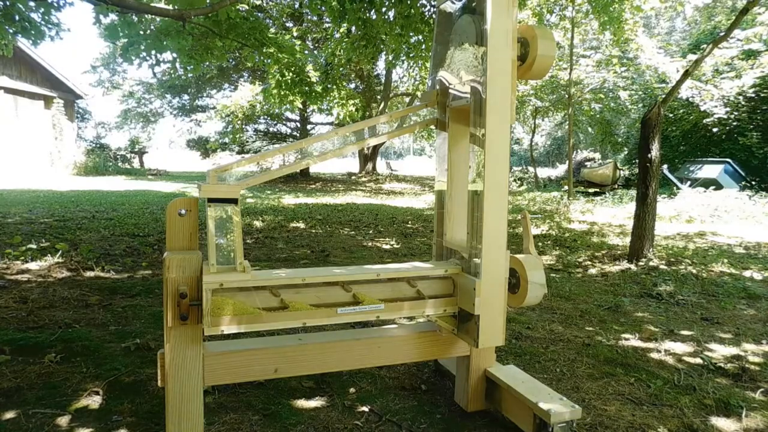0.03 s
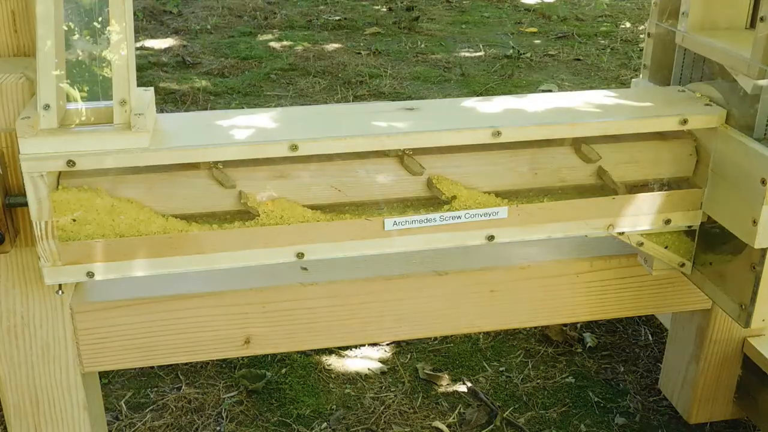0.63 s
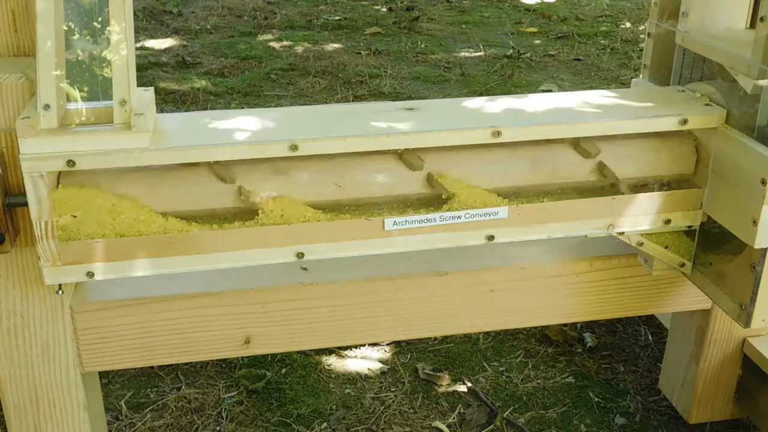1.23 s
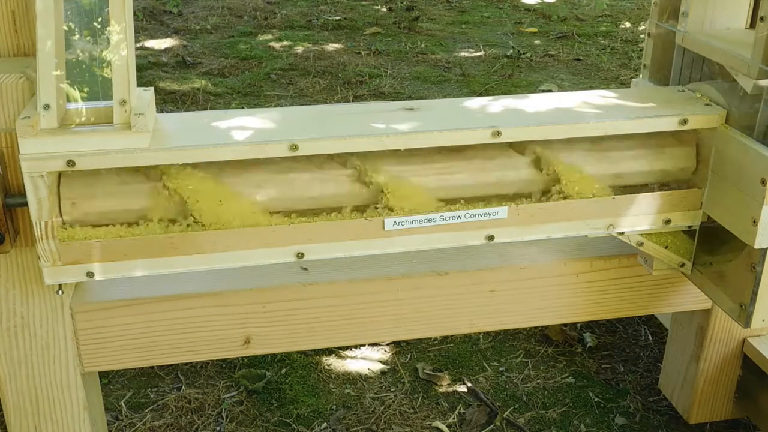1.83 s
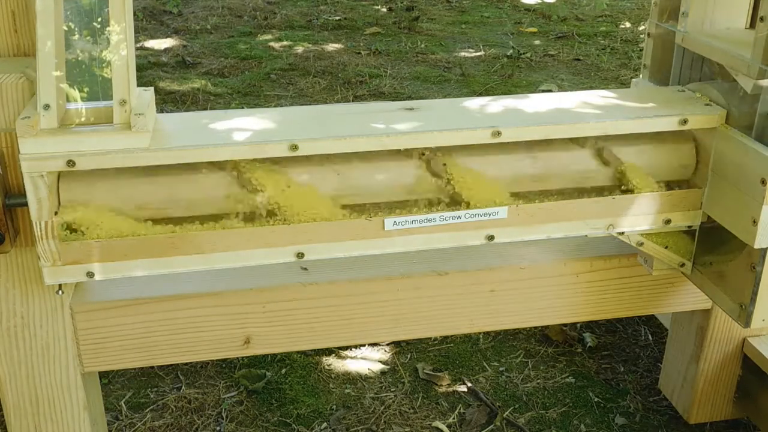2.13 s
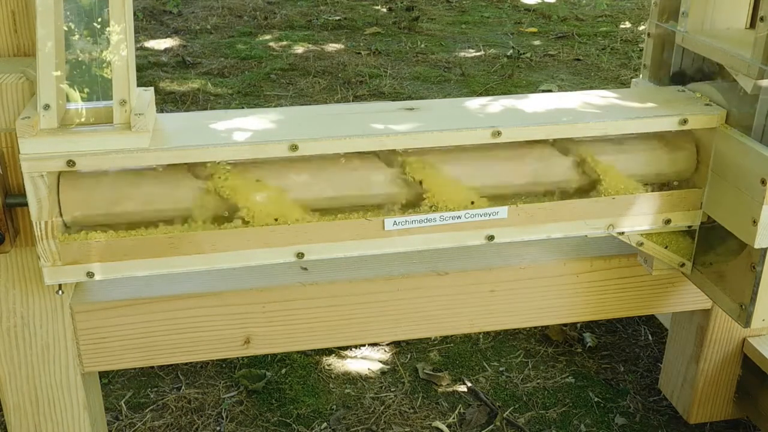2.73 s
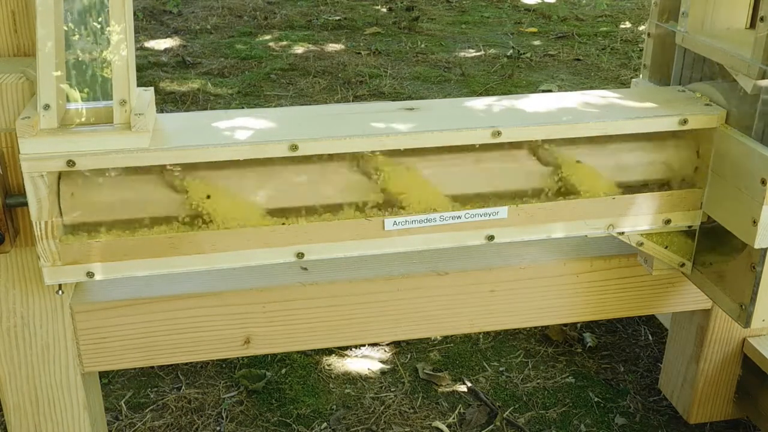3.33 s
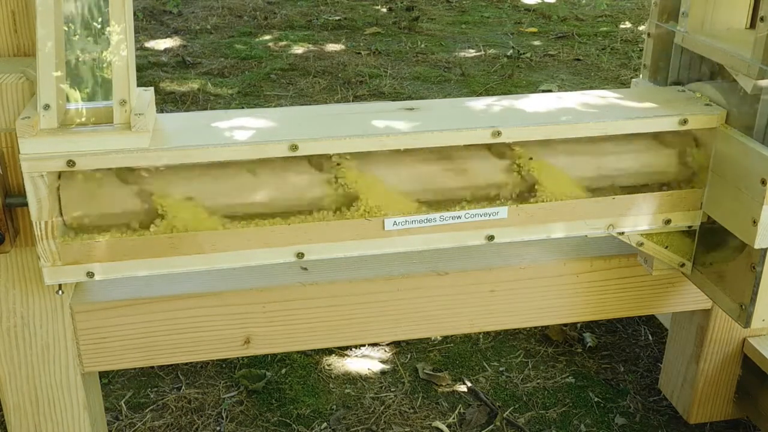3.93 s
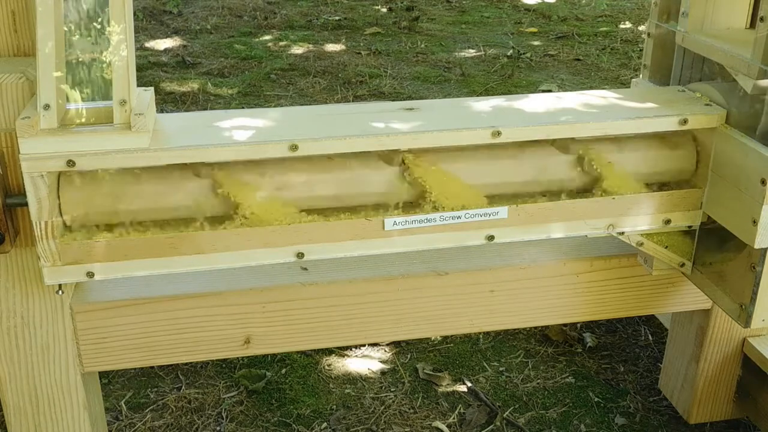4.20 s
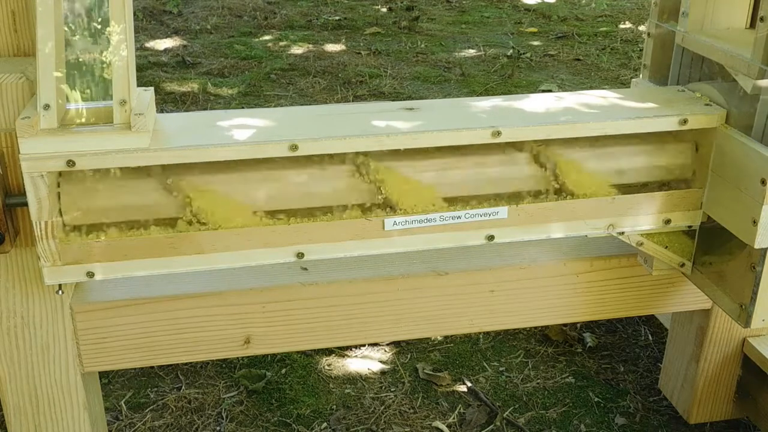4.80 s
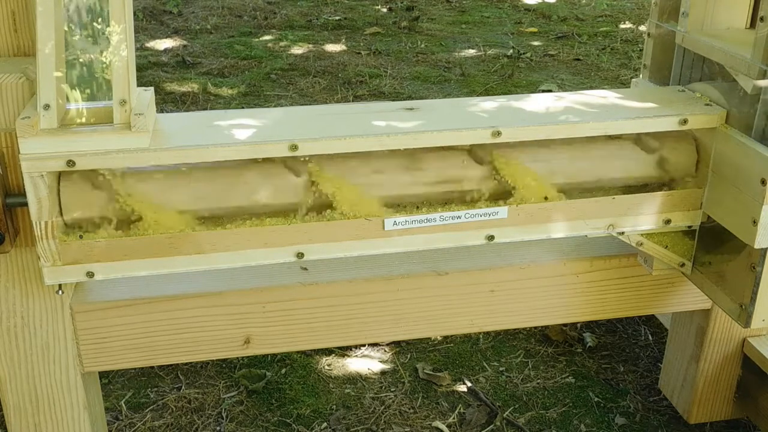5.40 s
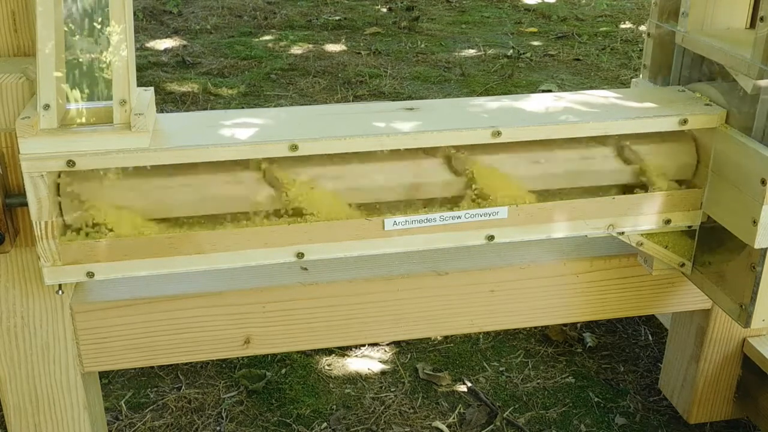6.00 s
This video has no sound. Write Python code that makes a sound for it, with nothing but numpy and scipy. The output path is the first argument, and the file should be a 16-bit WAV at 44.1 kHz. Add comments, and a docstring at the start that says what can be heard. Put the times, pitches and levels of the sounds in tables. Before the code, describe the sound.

After a faint outdoor hush and a few light knocks, a wooden screw conveyor starts turning close to the microphone. Dry grain slides and crunches along the trough, spilling off the screw in regular hissing surges. Wood grinds on wood, and the loose drive keeps up irregular clacks, knocks and low thumps over a faint open-air rumble.

```python
"""A faint outdoor hush and a few light knocks, then a wooden screw conveyor gets going close by.
Dry grain slides along the trough, crunches under the screw and tips off it in hissing heaps.
Wood grinds on wood, and the loose drive knocks and thumps in its frame, ringing the boards.
The stereo microphone stands near the trough in the open air, with a low rumble on all sides."""
import sys
import numpy as np
from scipy import signal
from scipy.io import wavfile

SR = 44100
rng = np.random.default_rng(int(sys.argv[2]) if len(sys.argv) > 2 else 0)


def transcribe(u):
    """Save the signal u as a 16-bit wav file named by the first command-line argument.

    u: samples, shape (n,) or (channels, n), limited to [-1, 1]; the rate is SR.
    q: integer samples, one column per channel.
    """
    v = np.clip(np.atleast_2d(u).T, -1, 1)
    q = np.round(v * 32767).astype(np.int16)
    wavfile.write(sys.argv[1], SR, q)


N = 271215
TIME = np.arange(N) / SR
LEFT_RIGHT = np.array([[1], [-1]])  # sign of the side signal in each channel

# flow of grain along the trough as the screw gets going: (time [s], level [dB])
GRAIN_FLOW = [(0.4, -69), (0.96, -70), (1.42, -53.5), (1.86, -40.5), (1.92, -48), (2.34, -40), (2.5, -40),
              (3.04, -38), (3.95, -38), (4.15, -36.5), (4.96, -38), (5.36, -40.5), (5.52, -39), (5.75, -36),
              (6.15, -38.5)]
# heaps tip off the screw about 2.5 times a second: (time [s], swell time [s], peak level [dB])
TIPPING_HEAPS = [(1.946, 0.026, -33), (2.361, 0.022, -34), (2.754, 0.01, -33.5), (3.137, 0.02, -33),
                 (3.512, 0.012, -32), (3.918, 0.018, -33.5), (4.273, 0.0094, -34), (4.678, 0.016, -33.5),
                 (5.083, 0.012, -31.5), (5.563, 0.02, -34.5), (5.928, 0.024, -35)]
# a jammed kernel rasps through: (time [s], length [s], level [dB])
KERNEL_RASPS = [(0.42, 0.082, -57), (1.485, 0.033, -44.5), (2.115, 0.034, -35), (2.525, 0.028, -36.5),
                (3.29, 0.06, -37), (3.7, 0.12, -50), (4.4, 0.039, -34), (4.83, 0.045, -33.5)]
# single kernels crack under the screw: (time [s], level [dB], centre [Hz])
KERNEL_CRACKS = [(0.947, -51, 4500), (1.2303, -32.5, 8900), (1.492, -41, 6960), (1.569, -39.5, 6900),
                 (1.606, -41, 7000), (1.638, -36.5, 6000), (1.667, -37, 5940), (1.763, -36, 7460),
                 (1.9226, -33, 3300), (1.946, -30, 4230), (2.175, -34, 4860), (2.207, -36, 4470),
                 (2.5037, -32, 3000), (2.5207, -26, 2900), (3.269, -29, 3000), (3.7464, -28, 3200),
                 (4.3957, -30, 3200), (4.827, -32, 3120)]
# pressure of the screw on its wooden bearings, heard as rubbing: (time [s], level [dB])
BEARING_RUB = [(0.4, -101), (0.91, -62), (1.33, -52.5), (1.5, -47), (1.78, -38.5), (1.9, -40.5),
               (2.08, -45.5), (2.29, -43), (2.48, -41), (2.62, -42), (2.85, -42), (3.7, -40.5), (4.34, -39),
               (5.32, -43.5), (5.6, -40), (6.15, -41.5)]
# the screw scuffs along the boards: (time [s], length [s], level [dB])
BOARD_SCUFFS = [(0.42, 0.17, -60), (1.15, 0.067, -47.5), (2.42, 0.053, -34), (2.57, 0.035, -46),
                (2.685, 0.031, -34.5), (2.835, 0.033, -36.5), (3.04, 0.014, -30.5), (4.048, 0.046, -30.5),
                (4.228, 0.01, -34.5), (4.7, 0.034, -36), (5.16, 0.071, -43.5), (6.11, 0.044, -36)]
# the loose drive knocks on the trough: (time [s], base level [dB], hardness [dB], rattle [dB],
# ring pitch [Hz], ring level [dB], ring t60 [s])
DRIVE_KNOCKS = [(0.402, -54.5, 4, -5, 820, -58, .03), (0.8886, -54, 0, -3, 1310, -42, .045),
                (0.945, -53.5, 5, 2, 1290, -58, .04), (1.2298, -39, 12.5, 5, 2260, -23, 0.046),
                (1.3638, -33, 1.5, -2, 940, -41, 0.041), (1.434, -40.5, -5, 5, 900, -48, .04),
                (1.617, -38, -21, -18, 560, -39, .04), (1.638, -36.5, -1, -3, 466, -46, .046),
                (1.761, -33, 6.5, 3, 744, -44, .03), (1.7631, -30, 11.5, -1, 2105, -28, 0.045),
                (1.7653, -31.5, 4.5, -7, 1360, -21, 0.047), (1.7668, -33, -9, 8, 470, -27.5, 0.063),
                (1.7862, -31.5, 7, -13, 1118, -21, .06), (1.801, -35, -1, -6, 1120, -30, .05),
                (1.826, -34.5, -4, -6, 450, -32, .09), (2.003, -35.5, -20, 0, 546, -50, .11),
                (2.081, -37.5, 0, 2, 505, -38, .036), (2.2715, -33.5, -1, 3, 760, -25.5, 0.023),
                (2.385, -30, -10, -3, 476, -32, 0.21), (2.462, -36, -10, -3, 525, -38, .03),
                (2.5031, -38.5, 6, -7, 1420, -34, .04), (2.551, -40, -15, 0, 480, -43, .08),
                (2.581, -32, -17, 1, 960, -38, 0.099), (2.746, -31.5, -7, -13, 550, -28, .044),
                (2.866, -31, -4, 6, 958, -33, 0.16), (3.024, -33, 6, -3, 476, -42, .073),
                (3.201, -40, -12, 7, 820, -54, 0.034), (4.026, -40, -5, 2, 940, -38, .088),
                (4.046, -46, -7, 4, 950, -35, 0.087), (4.123, -37, -5, -3, 556, -42, .05),
                (4.2115, -28.5, -11, -17, 553, -38, 0.057), (4.4467, -29, 4.5, -6, 720, -21, 0.031),
                (4.449, -34, 4, -3, 1407, -24, 0.22), (4.465, -36, 6, 8, 720, -37, .05),
                (4.9333, -29.5, -.5, -11, 950, -40, .03), (5.109, -39.5, -5, -6, 972, -44, .04),
                (5.164, -37, -11, 4, 483, -40, .05), (5.202, -32, -11, -3, 890, -40, .043),
                (5.389, -35.5, -15, -2, 473, -47, .05), (5.507, -36, -1.5, 7, 560, -49, 0.042),
                (5.8095, -31.5, 4.5, -5, 467, -38, 0.22)]
# the screw drops heavily in its frame: (time [s], base level [dB], ring pitch [Hz])
FRAME_THUMPS = [(1.7786, -35, 413), (2.6431, -30.5, 320), (3.203, -38.5, 290), (3.54, -29.5, 307),
                (3.551, -39, 660), (3.686, -40.5, 200), (3.806, -41, 460), (3.96, -41, 131),
                (4.06, -44, 304), (4.189, -37, 350), (4.807, -40, 346), (4.876, -36.5, 347),
                (4.9974, -35.5, 380), (5.6713, -26, 340), (5.682, -44, 172), (5.699, -41, 382),
                (5.8639, -35, 700), (5.995, -38, 700)]
# low outdoor rumble: (time [s], level [dB])
RUMBLE_LEVEL = [(0, -60.5), (1.3, -63), (2.2, -65), (3, -61.5), (3.75, -58.5), (3.97, -50), (4.06, -64),
                (4.4, -59), (4.85, -55), (5.01, -47), (5.16, -63), (5.5, -57), (5.73, -51.5), (6.15, -61)]
# the sound drops out briefly near the start: (time [s], gain [ratio])
DROPOUT_GAIN = [(0, 1), (.025, 1), (.04, 0), (.17, 0), (.195, 1), (6.15, 1)]

# modes of the trough and frame, the screw and drive, and the clear window that kernels patter on:
# (frequency [Hz], relative level [dB], t60 [s])
TROUGH_MODES = [(116, 1.5, 0.14), (164, -10.5, 0.077), (200, -9, 0.035), (310, -7, 0.12), (330, -5, 0.068),
                (380, -20.5, 0.018), (434, 5, 0.058), (475.4, 3.5, 0.082), (494, 9, 0.027),
                (560, -1.5, 0.046), (700, 1, 0.069), (870, 3.5, 0.066), (951, -3, 0.24), (977, -3.5, 0.077)]
SCREW_MODES = [(1120, 0, 0.07), (1260, 1.5, 0.032), (1362, -2, 0.054), (1490, 4.5, 0.036),
               (1840, -7.5, 0.038), (2164, -0.5, 0.034), (2373, 0, 0.032), (2734, 6.5, 0.02),
               (3002, 9.5, 0.034), (3760, -2, 0.049), (4435, 10.5, 0.052)]
WINDOW_MODES = [(3650, -13, .01), (4250, -6.5, .01), (6370, -2, 0.0041), (9100, 1, .0045)]
# tone of each noise, from the grain to the background: (frequency [Hz], relative band gain [dB])
SLIDE_TONE = [(1500, 4.5), (2600, 5), (3700, 4.5), (5000, 2), (7000, 1), (9200, -3), (12000, -5),
              (16000, -7)]
CRUNCH_TONE = [(500, -39), (900, 4.5), (1400, -9), (1700, -3.5), (2300, 0.5), (2900, 0), (3500, -11.5),
               (4500, -10.5), (8000, -21.5)]
HEAP_TONE = [(1500, 3.5), (2600, -0.5), (3700, 4), (5000, 0.5), (7000, 0), (9200, -3), (12000, -8.5),
             (16000, -12)]
GRIND_TONE = [(70, -13), (130, -19.5), (200, -6.5), (300, -2), (480, -8), (700, 5.5), (1000, -5),
              (1500, -2), (3000, -10.5)]
HUSH_TONE = [(150, 3.5), (300, -0.5), (600, 0.5), (1100, 5), (2000, 0.5), (3200, -6), (6000, -11.5),
             (10000, -13.5), (16000, -14.5)]
RUMBLE_TONE = [(22, 7.5), (40, 2), (62, 5), (100, 3), (160, -19), (300, -12.5)]
# stereo image at the microphone of the conveyor close by and of the open air all around:
# (frequency [Hz], channel likeness [-1..1], left minus right [dB])
CLOSE_IMAGE = [(100, 0.9, -1), (290, 0.98, -1), (700, 0.94, -0.6), (1300, 0.81, -0.5), (2100, 0.74, -2.5),
               (3300, 0.46, -1.5), (5500, 0.16, 0), (9100, -0.34, 3.5), (15000, -0.13, 1)]
AMBIENT_IMAGE = [(40, 0.8, -4.5), (110, 0.73, 1), (200, 0.21, -1.5), (700, 0.21, 0), (1300, 0.17, -0.5),
                 (2400, 0, -0.5), (15000, 0, 0)]


def sliding_grain():
    """Thousands of kernels tick along the boards close by; a stronger flow brings more of them."""
    flow = driven(GRAIN_FLOW, running_db=-41, follows=1.1, waver_db=0)
    per_s = 900 + 9000 * flow / flow.max()
    ticks = contacts(per_s, spread_db=0) / np.sqrt(per_s)
    return flow * band_noise(ticks, SLIDE_TONE, CLOSE_IMAGE, flicker_db=1)


def crunching_grain():
    """Squeezed kernels snap past each other in clumps and make the screw ring a little."""
    snaps = contacts(3800 * from_db(2.6 * drift(25)), spread_db=1)
    crackle = band_noise(snaps, CRUNCH_TONE, CLOSE_IMAGE, flicker_db=0.5)
    crunch = through(crackle, tap_response(SCREW_MODES, ring_db=-43))
    flow = driven(GRAIN_FLOW, running_db=-41, follows=0.92, waver_db=-1.5)
    squeeze = np.hypot(flow, swells(KERNEL_RASPS))
    return np.hypot(squeeze, from_db(-4) * heap_strength()) * unit_rms(crunch)


def spilling_grain():
    """Each falling heap showers the window with kernels and rings it brightly."""
    shower = band_noise(contacts(9000, spread_db=1), HEAP_TONE, CLOSE_IMAGE, flicker_db=1)
    patter = through(shower, tap_response(WINDOW_MODES, ring_db=-20.5))
    return heap_strength() * unit_rms(patter)


def heap_strength(drain_ratio=1.82, trickle_db=-7.5, trickle_s=0.17):
    """Each tipping heap swells, drains more slowly and leaves a dying trickle."""
    power = np.zeros(N)
    for s, swell_s, db in TIPPING_HEAPS:
        t = TIME - s
        surge = np.exp(-.5 * (t / np.where(t < 0, swell_s, swell_s * drain_ratio)) ** 2)
        trickle = from_db(trickle_db) * (t > 0) * np.exp(-.5 * (t / trickle_s) ** 2)
        power += (from_db(db) * np.maximum(surge, trickle)) ** 2
    return np.sqrt(power)


def cracking_kernels():
    """Pinched kernels crack: each dies within a few milliseconds and leaves a faint scatter."""
    t, out = TIME[:SR // 4], np.zeros((2, N + SR))
    dying = decay(t, 0, t60=0.0098) + decay(t, -19, t60=0.14)
    for s, db, hz in KERNEL_CRACKS:
        mid, side = unit_rms(band(rng.standard_normal((2, len(t))), hz / 1.4, hz * 1.4))
        add_at(out, s, from_db(db) * dying * (mid + 1.1 * side * LEFT_RIGHT))
    return out[:, :N]


def grinding_screw():
    """Wood rubs on wood in uneven slips that drive the low modes of the trough."""
    slips = contacts(2600 * from_db(2.5 * drift(18)), spread_db=1.46)
    friction = band_noise(slips, GRIND_TONE, CLOSE_IMAGE, flicker_db=1.7)
    grind = through(friction, tap_response(TROUGH_MODES, ring_db=-48))
    rub = driven(BEARING_RUB, running_db=-39, follows=1.08, waver_db=1.47)
    return np.hypot(rub, swells(BOARD_SCUFFS)) * unit_rms(grind)


def knocking_drive():
    """Heavy blows thump the frame, lighter ones knock the trough, hard edges clack on the screw."""
    light = [(s, db - 14.5, db, db + hardness, *rest) for s, db, hardness, *rest in DRIVE_KNOCKS]
    # a thump sits firmly, rattles little and rings briefly
    heavy = [(s, db, db - 1.5, db - 9, -10, hz, db - 17.5, 0.044) for s, db, hz in FRAME_THUMPS]
    times, thump_db, knock_db, clack_db, loose_db, hz, ring_db, ring_t60 = np.transpose(light + heavy)
    hits = dict(vary_db=3, count=len(times))  # each blow lands on a different spot
    frame = band(tap_response(TROUGH_MODES, ring_db=-83, **hits), 165, 483, order=4)
    trough = band(tap_response(TROUGH_MODES, ring_db=-52, **hits), 425, 1205, order=4)
    screw = band(tap_response(SCREW_MODES, ring_db=-36, **hits), 1144, 2524, order=5)
    edge = band(tap_response(SCREW_MODES, ring_db=-66, **hits), 2050, 4400, order=4)
    thump = blows(times, hz, thump_db, frame, rattle_db=loose_db - 27.5, rattle_t60=0.13,
                  tail_db=-40.5, tail_t60=0.3, width=0.1)
    knock = blows(times, hz, knock_db + 2.5, trough, rattle_db=loose_db - 16.5, rattle_t60=0.039,
                  tail_db=-29, tail_t60=0.11, width=0.14)
    clack = blows(times, hz, clack_db - .6, screw, rattle_db=loose_db - 9.5, rattle_t60=0.018,
                  tail_db=-28, tail_t60=0.16, width=0.45)
    # harder blows have shorter contacts, so their crack grows twice as fast in dB
    crack = blows(times, hz, 2 * clack_db + 15.5, edge, rattle_db=loose_db - 4, rattle_t60=0.037,
                  tail_db=-46, tail_t60=0.16, width=1)
    ring = ringing_wood(times, hz, ring_db, ring_t60)
    return (thump + knock + with_ground_echo(clack) + crack + ring) * from_db(-.3 * LEFT_RIGHT)


def blows(times, ring_hz, level_db, bodies, rattle_db, rattle_t60, tail_db, tail_t60, width):
    """Each blow is a push, a rattle of loose joints and a faint tail, heard through the struck body."""
    t, out = TIME[:SR // 4], np.zeros((2, N + SR))
    for s, hz, db, loose_db, body in zip(times, ring_hz, level_db, rattle_db, bodies):
        dying = decay(t, loose_db, rattle_t60) + decay(t, tail_db, tail_t60)
        favoured_pitch = from_db(5) * band(body, hz / 1.047, hz * 1.047, order=1)
        mid, side = rng.standard_normal((2, len(t))) * dying
        push = (t == 0) + mid + width * side * LEFT_RIGHT
        blow = through(push, body + favoured_pitch)[:, :len(t)]
        attack_rms = np.sqrt(np.mean(blow[:, :SR // 100] ** 2))
        add_at(out, s, from_db(db) * blow / attack_rms)
    return out[:, :N]


def ringing_wood(times, ring_hz, level_db, t60s):
    """The spot that is hit favours one pitch, which rings on by itself."""
    t, out = TIME[:SR // 4], np.zeros(N + SR)
    for s, hz, db, t60 in zip(times, ring_hz, level_db, t60s):
        add_at(out, s, decay(t, db, t60) * np.sin(2 * np.pi * hz * t))
    return out[:N]


def with_ground_echo(x, delay_s=.0044, echo_db=-18):
    """One early reflection comes off the ground to the microphone."""
    return x + from_db(echo_db) * np.pad(x, [(0, 0), (round(delay_s * SR), 0)])[:, :N]


def outdoors():
    """A distant hush over a low, swelling rumble reaches the microphone from all sides."""
    hush = from_db(-53.5) * band_noise(1, HUSH_TONE, AMBIENT_IMAGE, flicker_db=1.5)
    rumble = band_noise(1, RUMBLE_TONE, AMBIENT_IMAGE, flicker_db=3.5)
    return hush + from_db(in_time(RUMBLE_LEVEL)) * rumble


def driven(curve, running_db, follows, waver_db):
    """Strength of a wavering layer that moves `follows` dB for each dB of its curve."""
    full_speed_db = -40
    return from_db(running_db + follows * (in_time(curve) - full_speed_db) + waver_db * drift(14.7))


def swells(rows):
    """Strength of short rubs that each rise and fall smoothly."""
    return sum(from_db(db) * np.exp(-2 * ((TIME - s) / length) ** 2) for s, length, db in rows)


def contacts(per_s, spread_db):
    """Tiny impacts at random moments; a spread in size gives many small and a few large."""
    sizes = from_db(spread_db * np.minimum(rng.exponential(1, N), 4))
    return sizes * (rng.random(N) < per_s / SR)


def band_noise(strength, tone, image, flicker_db):
    """Flickering half-octave bands of stereo noise, excited by random amounts of `strength`; rms 1."""
    out, edges = 0, 22 * 2 ** np.arange(0, 10, .5)
    push = rng.standard_normal((2, 2, N)) * strength
    for k, (low, high) in enumerate(zip(edges, edges[1:])):
        if high < tone[0][0] or low > tone[-1][0]:
            continue
        hz = np.sqrt(low * high)
        level_db, = at_hz(tone, hz)
        alike, pan_db = at_hz(image, hz)
        mid, side = band(push[k % 2], low, high)  # neighbouring bands get separate noise
        stereo = np.sqrt(1 + alike) * mid + np.sqrt(1 - alike) * side * LEFT_RIGHT
        out += stereo * from_db(pan_db / 2 * LEFT_RIGHT) * from_db(level_db + flicker_db * drift(27.4))
    return unit_rms(out)


def tap_response(modes, ring_db, vary_db=0, count=1):
    """A part's answers to `count` taps: a click and dying modes, their weights scattered by `vary_db`."""
    t = TIME[:SR // 6]
    ringing = np.array([decay(t, db, t60) * np.cos(2 * np.pi * hz * t) for hz, db, t60 in modes])
    weights = from_db(ring_db + vary_db * rng.standard_normal((count, len(modes))))
    return (t == 0) + weights @ ringing


def drift(rate_hz):
    """Smooth random wander of rms 1, mostly slower than `rate_hz`."""
    step, settle = 40, 2000
    pole = np.exp(-2 * np.pi * rate_hz * step / SR)
    noise = rng.standard_normal(N // step + settle + 2)
    slow = signal.lfilter([1], [1, -2 * pole, pole * pole], noise)[settle:]
    return np.interp(np.arange(N) / step, np.arange(len(slow)), unit_rms(slow))


def through(x, response):
    """Pass a signal through an impulse response."""
    return signal.fftconvolve(np.atleast_2d(x), np.atleast_2d(response), axes=1)[:, :N]


def band(x, low_hz, high_hz, order=2):
    """Causal band-pass."""
    sos = signal.butter(order, [low_hz, min(high_hz, SR / 2 - 1)], "band", fs=SR, output="sos")
    return signal.sosfilt(sos, x + 1e-18)


def decay(t, start_db, t60):
    """A gain that falls 60 dB every `t60` seconds."""
    return from_db(start_db - 60 * t / t60)


def add_at(track, time_s, sound):
    """Mix a sound into a track at the given time."""
    start = round(time_s * SR)
    track[..., start:start + sound.shape[-1]] += sound


def in_time(rows):
    """A curve read at every sample."""
    return np.interp(TIME, *np.transpose(rows))


def at_hz(rows, hz):
    """The columns of a table read on a log-frequency axis."""
    grid, *columns = np.transpose(rows)
    return [np.interp(np.log(hz), np.log(grid), column) for column in columns]


def from_db(db):
    """Decibels to gain."""
    return 10 ** (np.asarray(db) / 20)


def unit_rms(x):
    """Scale to rms 1."""
    return x / np.sqrt(np.mean(x ** 2) + 1e-20)


def scene():
    """The conveyor close by in the open air; its wood reaches the left channel one sample later."""
    left, right = crunching_grain() + grinding_screw() + knocking_drive()
    wood = np.array([np.append(0, left[:-1]), right])
    return wood + sliding_grain() + spilling_grain() + cracking_kernels() + outdoors()


def record(dry):
    """The sound drops out briefly near the start, and the top treble is cut steeply."""
    cutoff_hz = 15750
    low_pass = signal.ellip(10, .1, 80, cutoff_hz, fs=SR, output="sos")
    return signal.sosfilt(low_pass, dry * in_time(DROPOUT_GAIN) + 1e-18)


dry = scene()
out = record(dry)
transcribe(out)
```